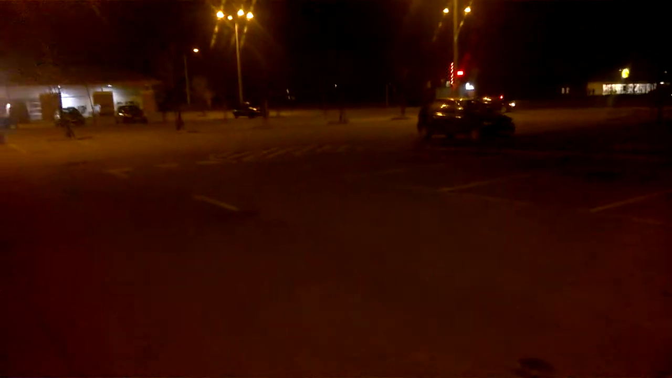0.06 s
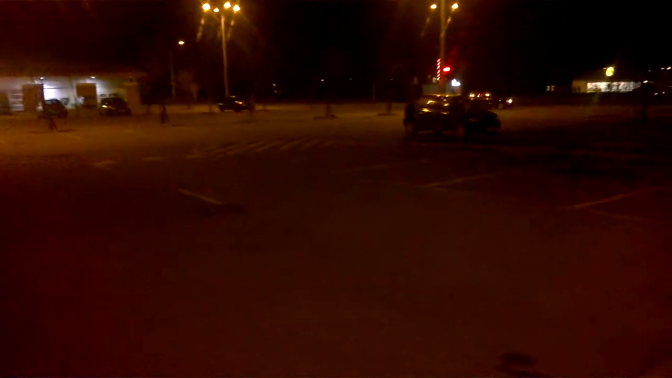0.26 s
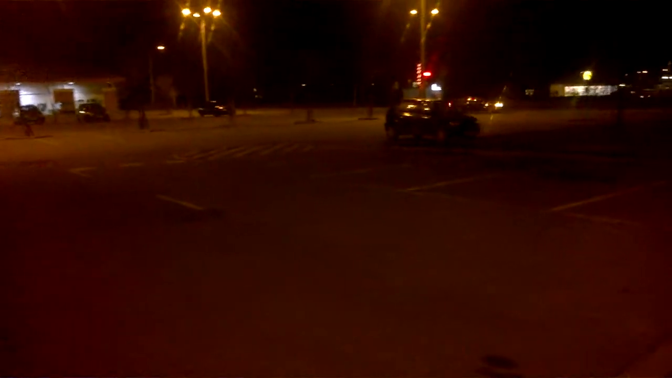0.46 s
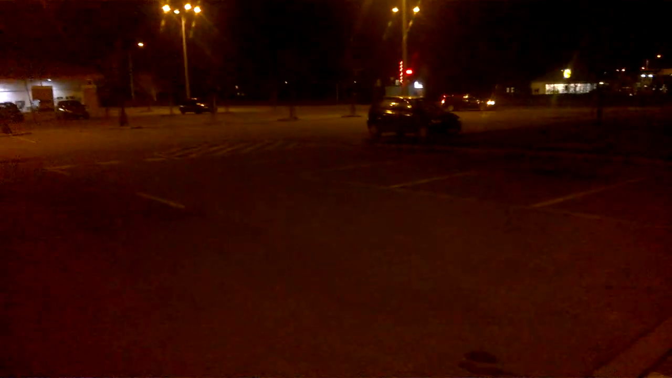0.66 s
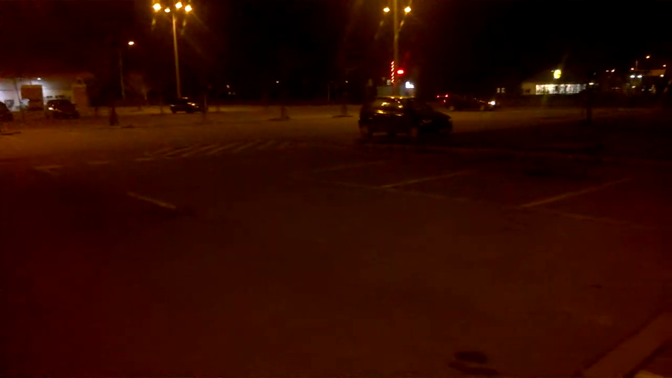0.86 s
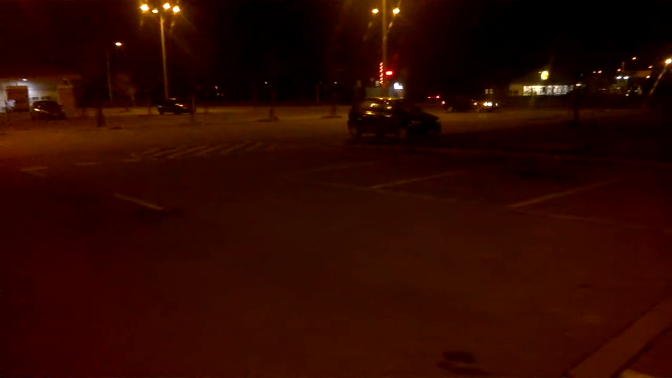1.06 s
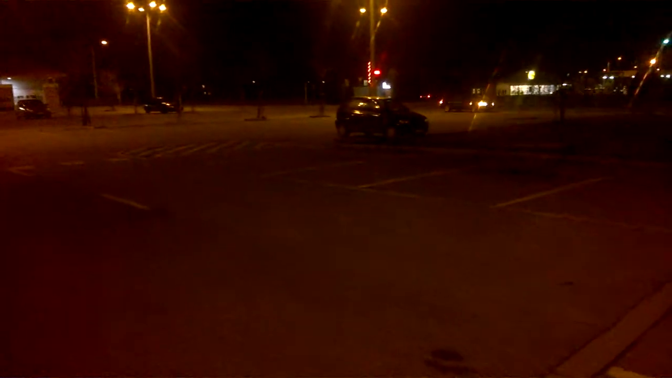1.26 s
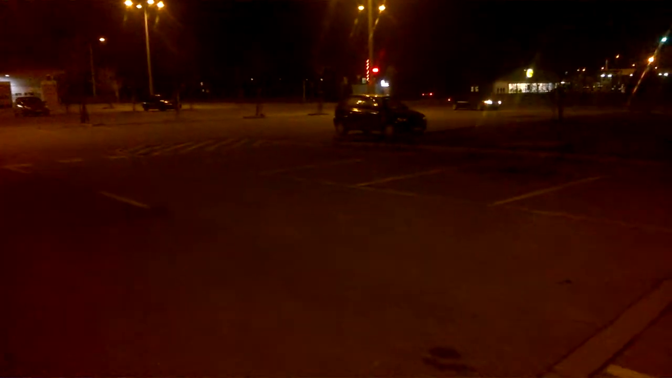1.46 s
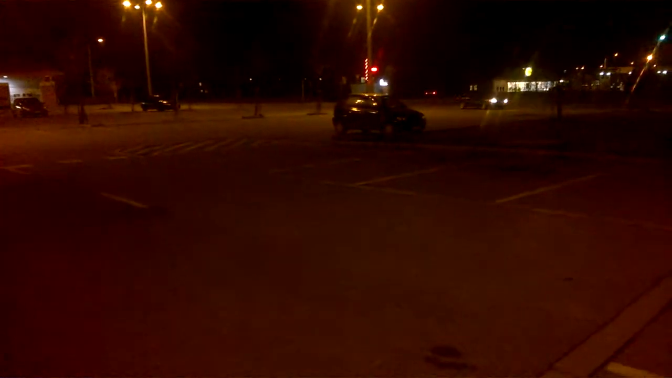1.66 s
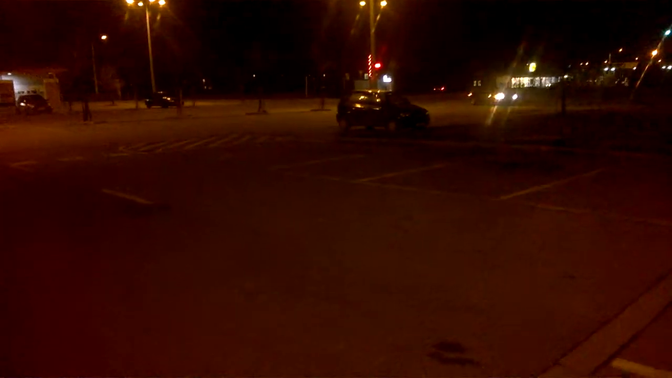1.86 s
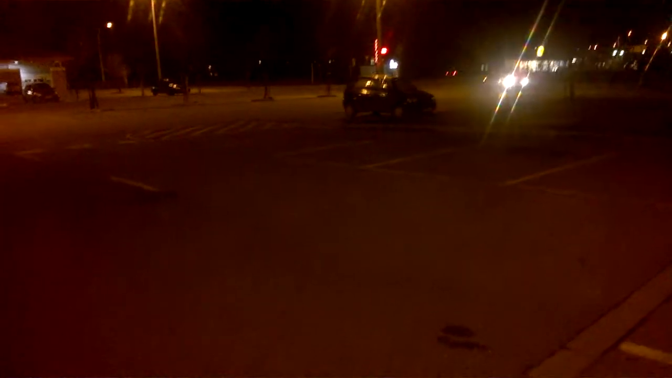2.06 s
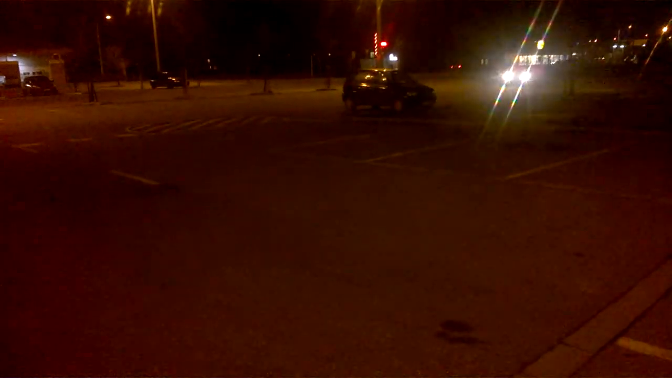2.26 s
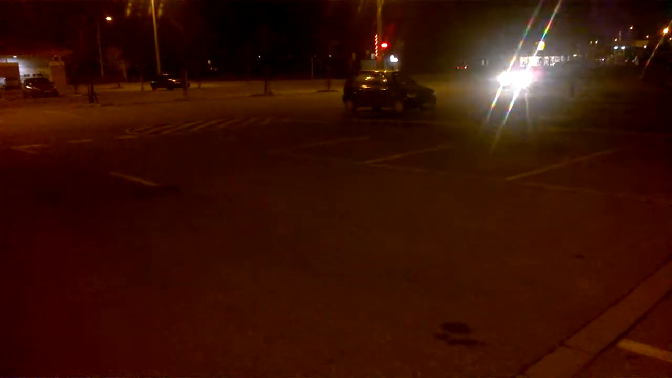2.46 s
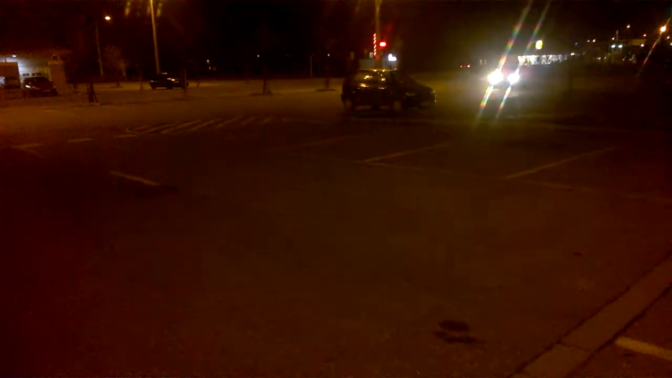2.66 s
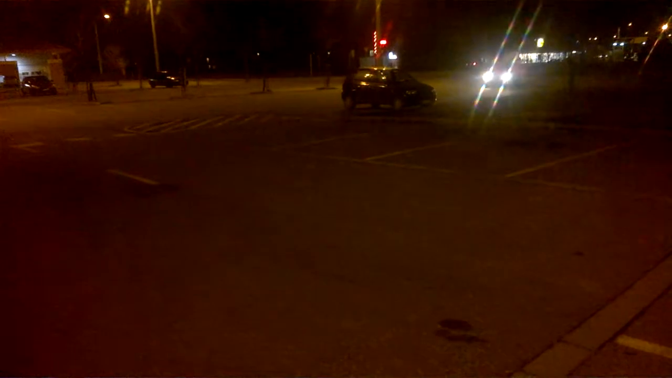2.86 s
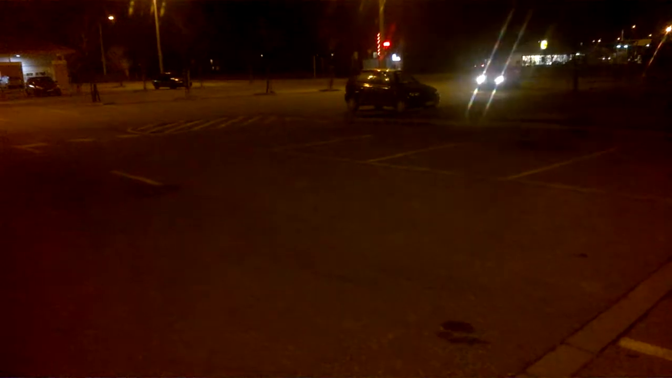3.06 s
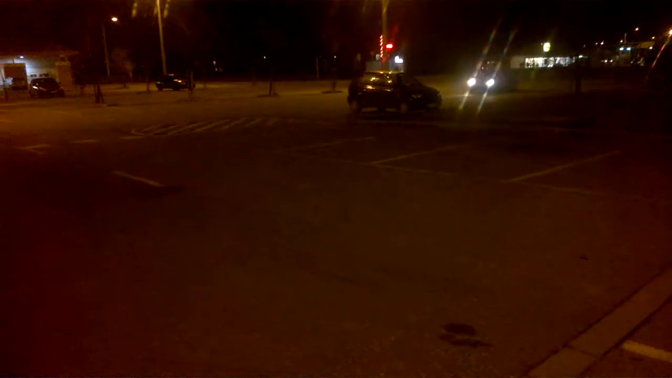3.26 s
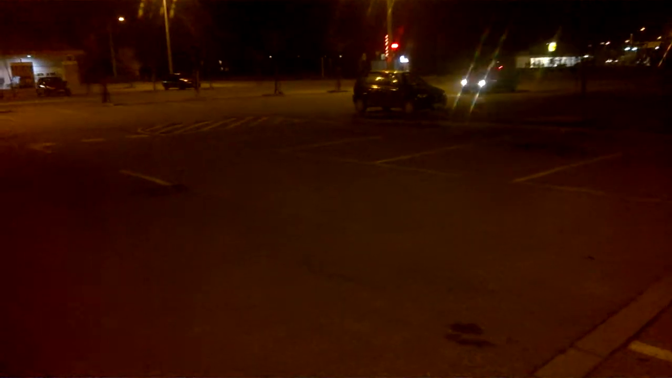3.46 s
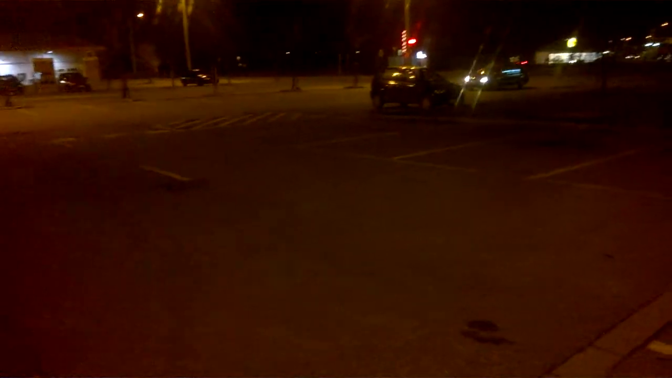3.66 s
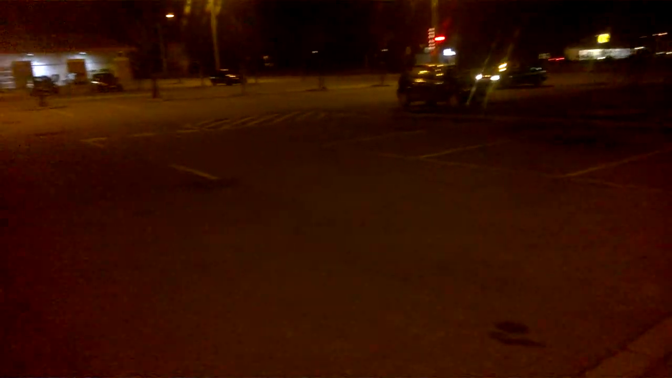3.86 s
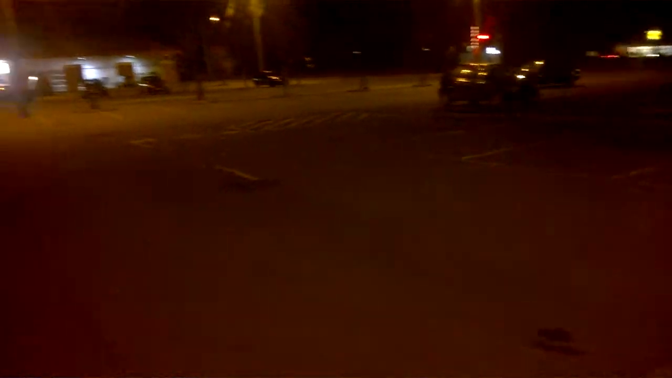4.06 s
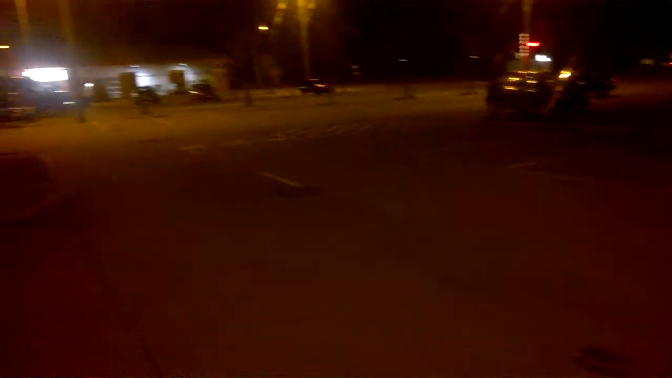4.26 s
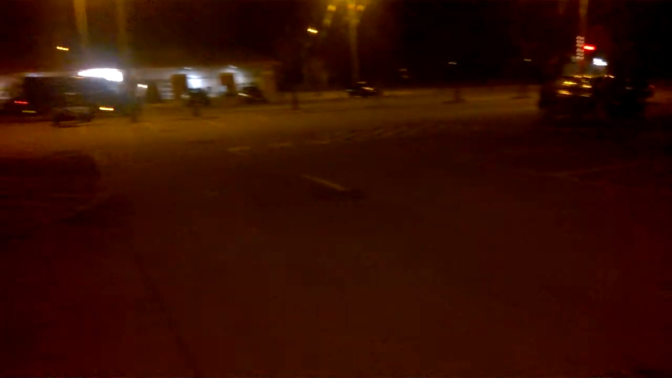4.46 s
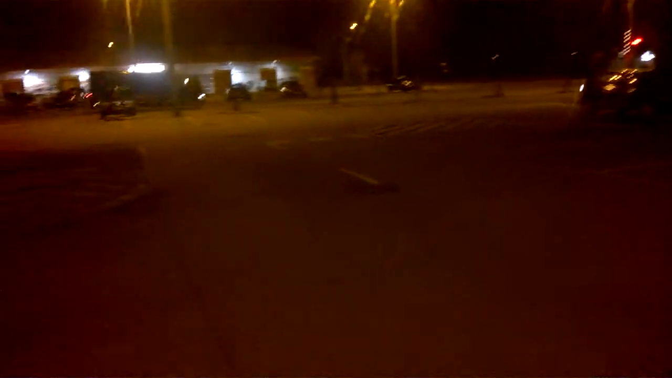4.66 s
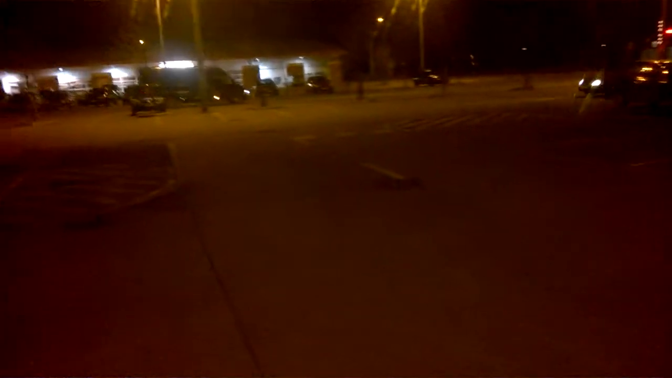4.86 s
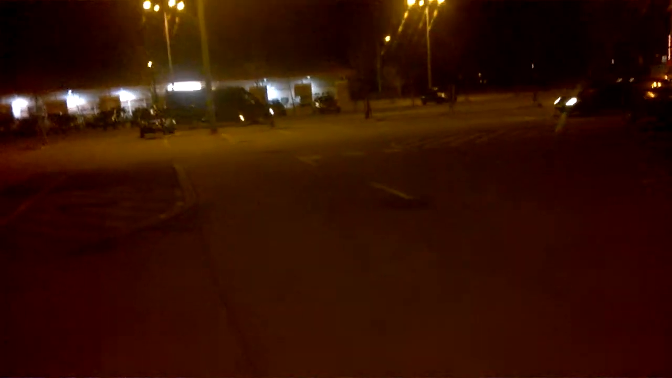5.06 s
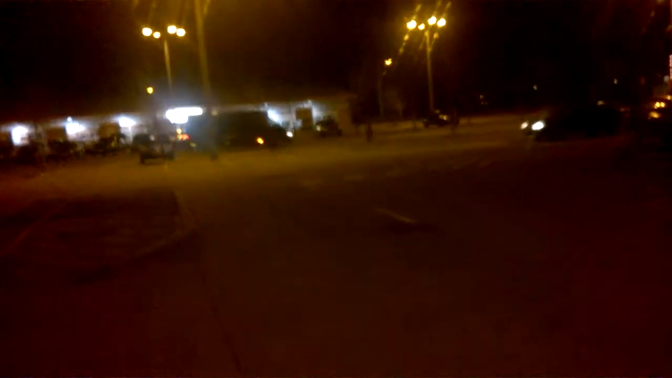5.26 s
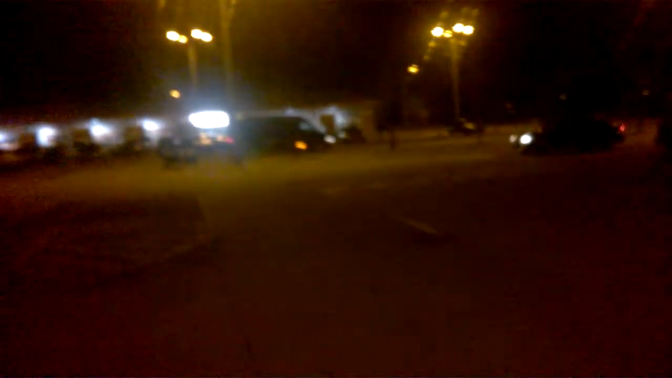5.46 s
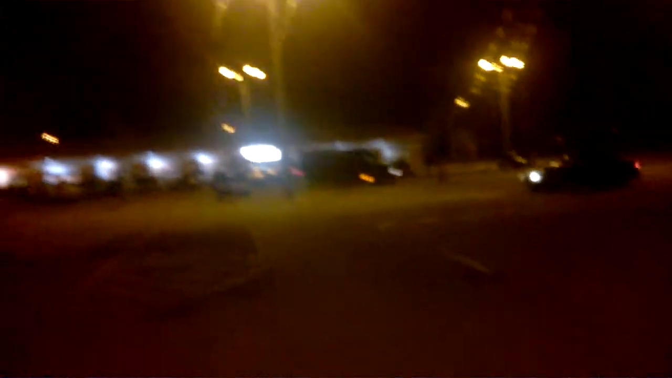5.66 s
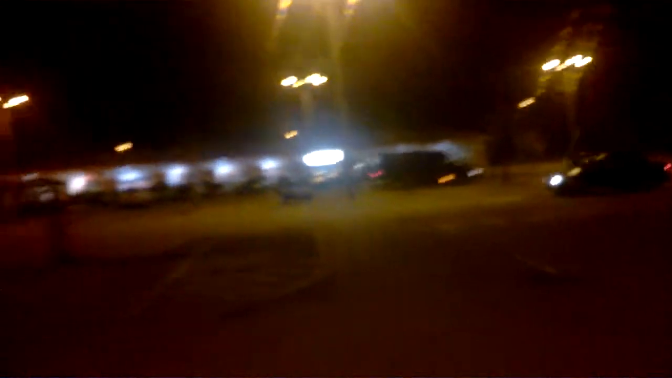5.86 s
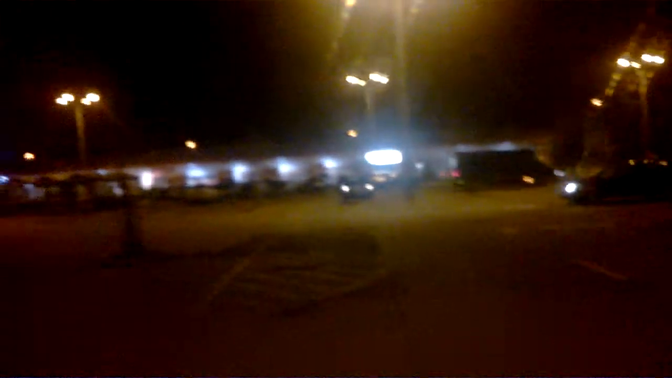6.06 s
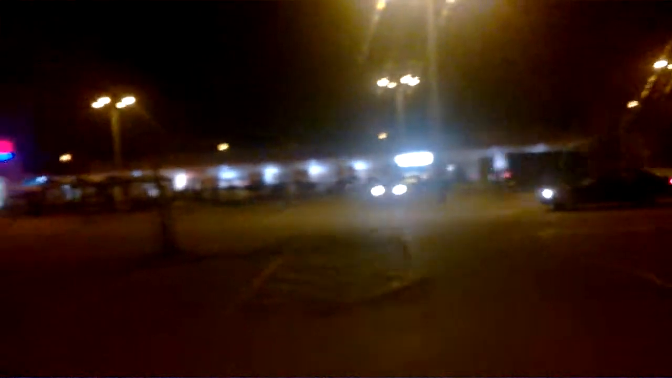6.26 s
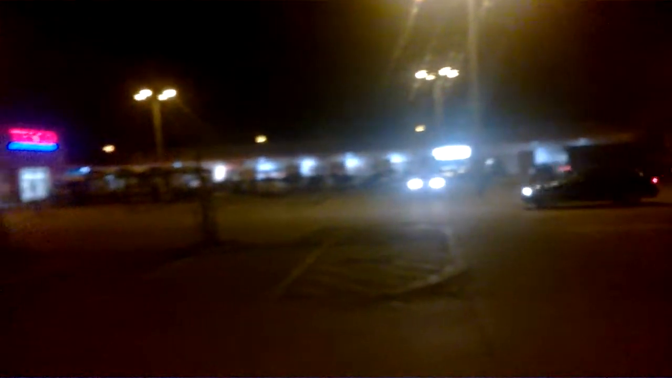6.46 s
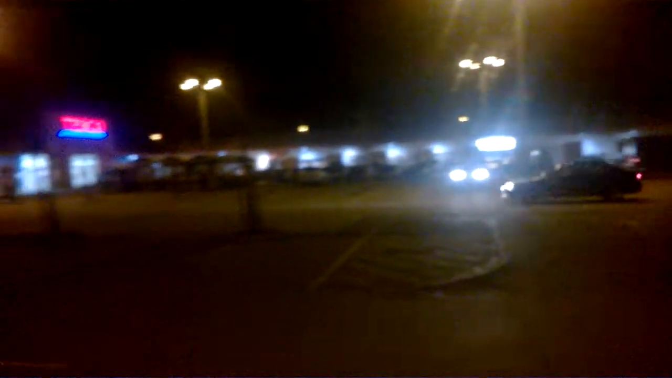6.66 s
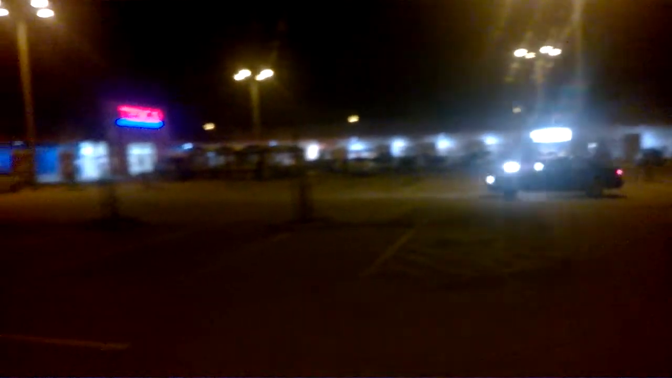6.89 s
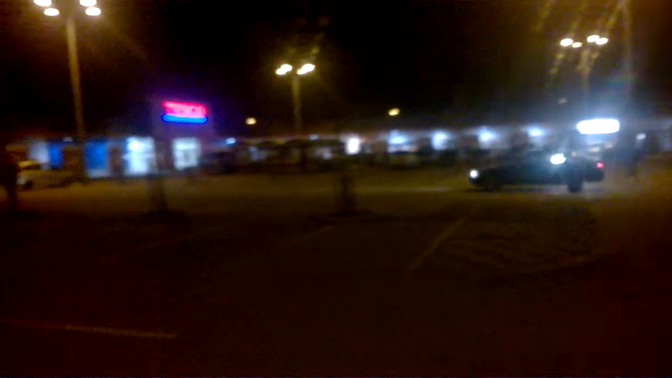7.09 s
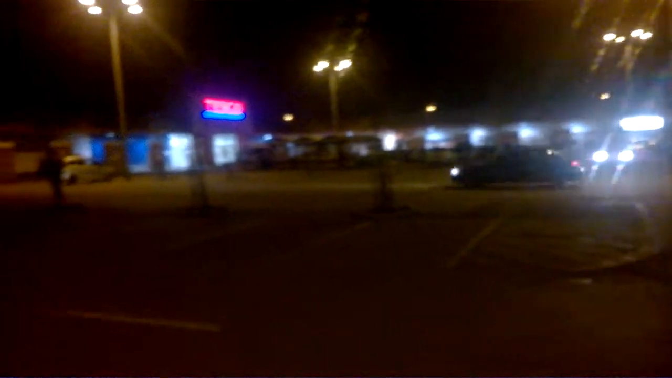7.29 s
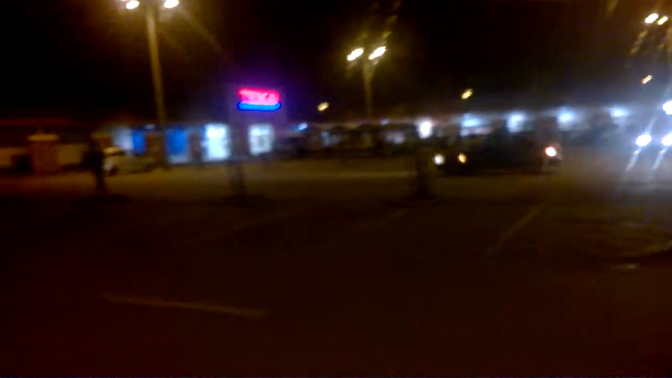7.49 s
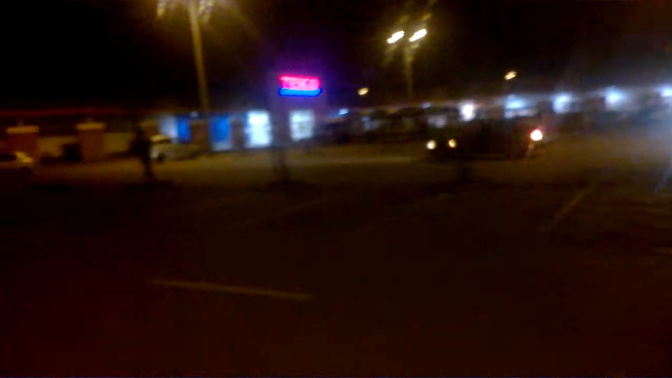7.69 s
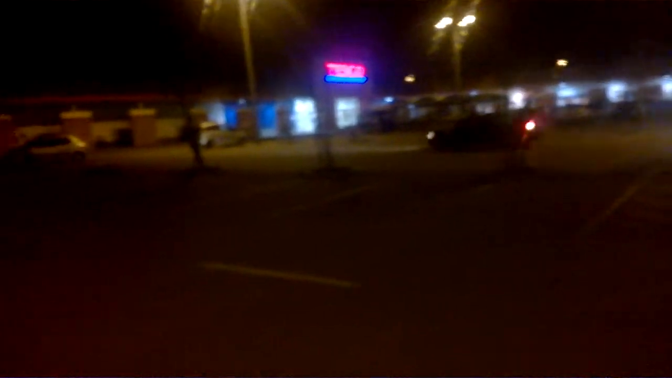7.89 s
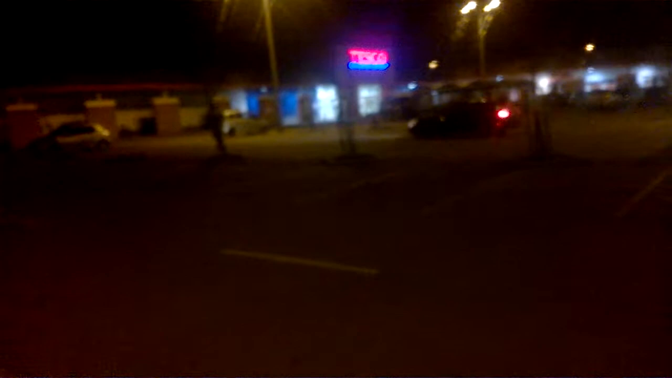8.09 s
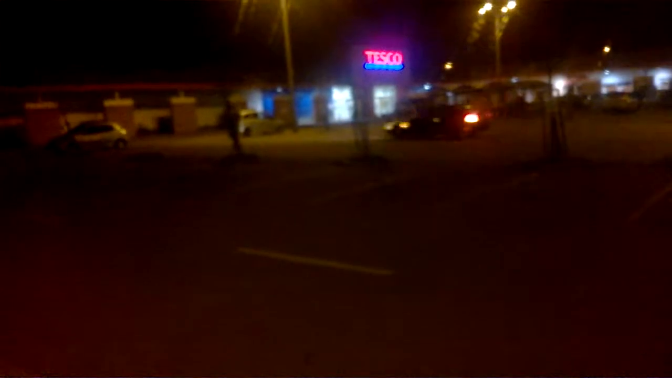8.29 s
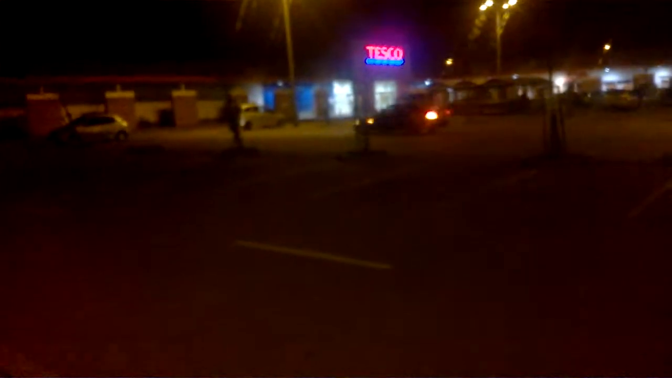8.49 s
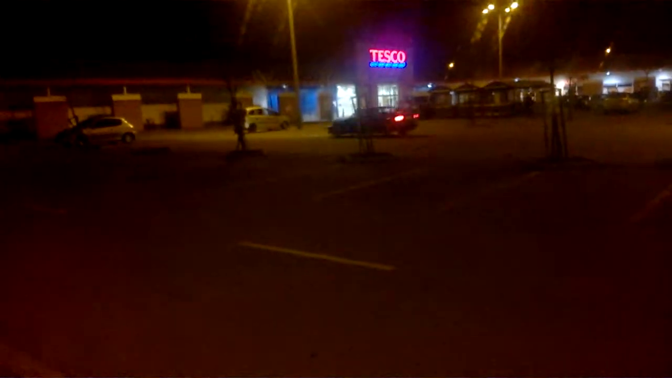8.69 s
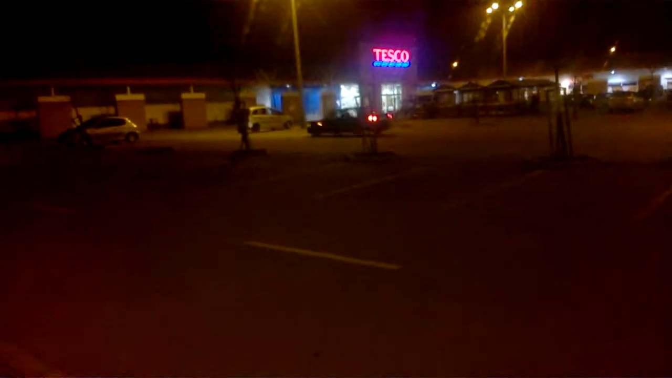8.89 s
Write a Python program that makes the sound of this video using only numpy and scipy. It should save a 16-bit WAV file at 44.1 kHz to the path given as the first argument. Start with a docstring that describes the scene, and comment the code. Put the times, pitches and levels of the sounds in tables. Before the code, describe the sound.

Low exhaust burble rises and drops, then swells into a strong droning roar before falling away, over steady airy tyre hiss in an open lot.

```python
"""A car with a loud exhaust crosses an open parking lot at night. It idles and pulls away while a second engine
drones far off, lifts off, revs higher as it comes near, then coasts down, its tyres scuffing. The engine is a
sum of firing orders shaped by the pipe, plus gas noise; shop fronts echo its note. Tyre roar on the asphalt is
coloured noise combed by a short echo; a few grit ticks are filtered clicks. The microphone adds faint hiss and
cuts the top."""
import sys
import numpy as np
from scipy import signal
from scipy.fft import rfft, irfft, next_fast_len
from scipy.io import wavfile
from scipy.ndimage import map_coordinates

SR = 44100
rng = np.random.default_rng(int(sys.argv[2]) if len(sys.argv) > 2 else 0)


def to_wav(sig):
    """Store sig (one row per channel, or 1-D mono) as 16-bit WAV at the path in sys.argv[1].

    Samples outside -1..1 are clipped; the rate is SR.
    """
    pcm = np.clip(np.atleast_2d(sig), -1, 1) * 32767
    pcm = np.round(pcm).astype(np.int16)
    wavfile.write(sys.argv[1], SR, pcm.T)  # frames by channels


N = 393813

# Far engine. Each row: time in seconds, pitch in Hz, level in dB.
FAR_ENGINE_CURVE = [(1.15, 74.6, -73), (1.7, 74, -50.5), (2.1, 76, -48), (2.25, 64.2, -56.5),
                    (3.0, 64.65, -46.5), (3.7, 66.57, -46.5), (4.4, 69.9, -44), (4.7, 69, -86)]

# Grit ticks. Each row: time in seconds, click level in dB ahead of the band-pass.
GRIT_TICKS = [(1.7469, -41), (3.8846, -58), (4.815, -72), (4.8456, -62), (5.3481, -52), (6.3587, -45),
              (6.4242, -58)]
TICK_FADE_S, TICK_BAND_HZ = 0.009, (2800, 5400)

# Tyre noise ahead of the ground echo. Each row: time in seconds, tread roar in dB, tread hiss in dB,
# grit hiss in dB, top of the hiss in dB.
TYRE_LEVELS = [(0.03, -67, -55, -60.5, -82), (0.1, -64, -54.5, -59, -83), (0.82, -66, -61.5, -63.5, -84),
               (1.66, -63, -56, -62.5, -83), (2.42, -59, -55, -68.5, -82.5), (2.45, -59, -55.5, -72.5, -83),
               (2.77, -60, -56.5, -69, -83), (2.87, -57, -57, -60.5, -84), (3.88, -61.5, -55, -63, -81),
               (4.18, -63.5, -53.5, -60.5, -84.5), (4.5, -64, -52, -58, -78), (5.22, -54, -50.5, -55, -77),
               (5.34, -54, -51, -57, -74), (5.66, -51, -53.5, -57.5, -77.5),
               (6.25, -49, -50.5, -56.5, -77.5), (6.58, -53, -50.5, -58.5, -80.5),
               (7.19, -51.5, -52, -61.5, -81), (7.64, -52, -47.5, -56, -74.5),
               (8.18, -54, -46.5, -57.5, -72.5), (8.9, -59.5, -48.5, -62, -75)]
# Tyre noise spectra. Each row: frequency in Hz, relative density in dB per Hz.
TREAD_ROAR_SPECTRUM = [(500, -27.5), (750, -6.5), (1050, 1), (1300, -1), (1700, -14.5), (2400, -16)]
TREAD_HISS_SPECTRUM = [(900, -26), (1300, -3), (1700, 2), (1950, 0.5), (2200, -0.5), (2700, -7),
                       (3400, -28)]
GRIT_HISS_SPECTRUM = [(2200, -9.5), (3000, 1.5), (3600, 1.5), (4200, 0), (4700, -10), (5500, -29.5)]
TOP_HISS_SPECTRUM = [(3800, -28.5), (5000, -7), (6000, -7), (7500, -15), (9000, -24.5), (12000, -43.5)]
# Bright scuff as the tyres turn: start, full, fading and gone, in seconds.
SCUFF_TIMES_S = (7.35, 7.65, 8.27, 8.45)
SCUFF_DB = -64
# Scuff spectrum. Each row: frequency in Hz, relative density in dB per Hz.
SCUFF_SPECTRUM = [(3800, -17.5), (4400, -2), (5000, -2.5), (5500, -7.5), (6000, -21), (6600, -33)]
# Echo of the road noise off the asphalt. Each row: time in seconds, lag in ms, share of the direct gain (0-1).
GROUND_ECHO = [(0, 0.49, 0.28), (1.5, 0.51, 0.14), (2.5, 0.61, .3), (3.8, 0.64, 0.37), (3.95, 0.94, 0.23),
               (4.65, 0.78, 0.29), (5.4, 0.69, 0.16), (5.7, 1.1, 0.13), (6.2, 1.028, 0.24), (7.0, 1, .2),
               (8.3, 0.84, .1), (8.93, 0.93, .15)]

# Exhaust gas noise. Each row: time in seconds, rumble in dB, rasp in dB.
GAS_LEVELS = [(0, -48, -56.5), (1.1, -39, -58), (1.6, -52, -52.5), (2.25, -39, -54.5), (2.7, -53.5, -58),
              (3.7, -51, -56), (4.8, -37.5, -53), (5.6, -44.5, -52), (6.2, -37.5, -50), (6.9, -42, -52.5),
              (7.5, -35.5, -51), (7.85, -51.5, -52), (8.15, -44.5, -55), (8.93, -53.5, -56)]
# Gas noise spectra. Each row: frequency in Hz, relative density in dB per Hz.
RUMBLE_SPECTRUM = [(15, -29), (28, -11.5), (45, -11.5), (70, 5), (100, -2.5), (145, -14), (175, -17),
                   (260, -34.5)]
RASP_SPECTRUM = [(150, -23), (200, -2), (260, -2), (340, -4), (420, -8.5), (600, -10), (700, -12),
                 (800, -15.5), (1000, -29.5)]
# Tailpipe hiss spectrum. Each row: frequency in Hz, relative density in dB per Hz.
TAILPIPE_SPECTRUM = [(850, -20.5), (980, -1.5), (1060, -0.5), (1150, -3.5), (1350, -27), (1650, -24.5),
                     (1800, -4), (1900, -4), (2050, -8.5), (2250, -26)]
# Gas rushing through the tailpipe at full throttle: start, full, fading and gone, in seconds.
TAILPIPE_RUSH_TIMES_S = (5.0, 5.6, 6.5, 6.9)
TAILPIPE_RUSH_DB = -52

# Shop fronts. Each row: delay in seconds, echo gain in dB.
SHOP_FRONT_ECHOES = [(0.128, -26), (0.288, -19), (.42, -17)]

# Engine. Each row: time in seconds, firing rate in Hz, note level in dB ahead of dips and pipe,
# brightness in dB per octave, gain of the note above the silencer's cut in dB.
ENGINE_CURVE = [(0, 42.95, -38.5, 3.5, -6), (.14, 41.47, -42.5, 2.5, -10), (.32, 43.22, -38, 4, -11.5),
                (1.2, 43.36, -39.5, 0.7, 0), (1.4, 45.7, -33, 4.5, 0), (1.75, 53.7, -32, 7.5, -16),
                (2.03, 58.45, -33, 2.5, -0.5), (2.31, 59.2, -36.5, -3.5, 1), (2.62, 49.8, -55, 1.5, 0),
                (3.2, 49.05, -51.5, 1.5, -7), (3.4, 50.86, -39, 2.5, -15), (3.52, 47.5, -42.5, 7.5, -17),
                (3.69, 52.2, -34, 2.5, -9.5), (4.0, 53.3, -30, -0.1, 2.5), (4.5, 59.46, -18, -10.5, 17.5),
                (5.02, 67.64, -13, -6, 4.5), (5.52, 73.75, -22.5, 4.5, -0.5), (6.0, 80, -26.5, 5.5, 3),
                (6.3, 84.5, -17.5, -1.5, 12.5), (6.54, 89.2, -23.5, -1, 20.5), (6.68, 83.8, -31.5, 2.5, -4),
                (6.9, 78.65, -23, -11.5, -1), (7.15, 72, -20, -15.5, 7), (7.42, 61.55, -21.5, -8, 2),
                (7.79, 44.4, -36.5, 5, -7), (7.92, 38.8, -28, -3.5, -14), (8.0, 39.43, -48, -2, 0),
                (8.15, 46.67, -38.5, -8, 8), (8.93, 48.02, -42.5, -2.5, -3)]
# How unevenly the cylinders fire. Each row: time in seconds, roughness (0-1).
ROUGHNESS = [(0, .25), (.7, .3), (1.2, .45), (1.5, .2), (2.0, .4), (2.4, 1), (3.4, .7), (3.7, .4),
             (4.4, .4), (4.75, .1), (5.7, .12), (6.5, .25), (6.9, .3), (7.8, .35), (8.1, 1)]
# Brief dips of the note. Each row: time in seconds, depth in dB.
NOTE_DIPS = [(.73, 9), (1.071, 11.5), (1.14, 11), (1.779, 9), (2.21, 12), (2.371, 17), (3.86, 6.5),
             (4.11, 4.5), (4.341, 16), (5.74, 3), (5.959, 1.5), (6.07, 4.5), (6.74, 8), (7.17, 4),
             (7.69, 13)]
DIP_HALF_WIDTH_S = 0.02
# Pipe and silencer response met by every order. Each row: frequency in Hz, gain in dB.
PIPE_RESPONSE = [(35.0, -21.5), (50.0, -9), (65.0, -27.5), (77.0, -5.5), (85.0, 0.0), (95.0, -4),
                 (110.0, -4.5), (130.0, -5.0), (150.0, -12), (162.0, -22.5), (178.0, -33.5), (195.0, -19),
                 (215.0, -23.5), (240.0, -22.5), (260.0, -38), (280.0, -41), (310.0, -34.1), (350.0, -38),
                 (385.0, -38.5), (420.0, -46.5), (480.0, -36), (520.0, -51), (560.0, -59.5), (640.0, -65)]
# Silencer's cut: start and end of the transition, in Hz.
SILENCER_TRANSITION_HZ = (150, 180)
ORDERS = range(1, 9)   # multiples of the firing rate
# At full roughness: spread of phase, spread of level, and extra level spread for each order.
WAVER_RAD, FLICKER_DB, FLICKER_PER_ORDER_DB = 0.56, 4, 0.67
# Order 1.5, from uneven firing after the lift-off: start, full, fading and gone, in seconds.
HALF_ORDER_TIMES_S = (6.62, 6.85, 6.98, 7.25)
HALF_ORDER_DB = -35.5

MIC_HISS_DB, MIC_CUTOFF_HZ = -87.5, 15750   # hiss level ahead of the low-pass


def amp(db):
    """Decibels to gain."""
    return 10 ** (np.asarray(db) / 20)


def rms_one(x):
    """Scale to rms 1."""
    return x / np.sqrt(np.mean(x ** 2) + 1e-20)


def in_time(rows):
    """Table columns as sample-by-sample curves."""
    knots_s, *columns = np.transpose(rows)
    time_s = np.arange(N) / SR
    return [np.interp(time_s, knots_s, column) for column in columns]


def swell(start_s, full_s, fading_s, gone_s, db):
    """Gain that rises from silence, holds and falls back."""
    ramp = np.interp(np.arange(N) / SR, [start_s, full_s, fading_s, gone_s], [0, 1, 1, 0])
    return amp(db) * ramp ** 2


def drift(corner_hz):
    """Slow random curve of spread 1: coarse noise through a double one-pole low-pass."""
    step = 40   # samples per coarse point
    settle = 2000   # coarse points dropped while the filter settles
    pole = np.exp(-2 * np.pi * corner_hz * step / SR)
    noise = rng.standard_normal(N // step + 2 + settle)
    slow = signal.lfilter([1], [1, -2 * pole, pole * pole], noise)[settle:]
    return np.interp(np.arange(N) / step, np.arange(len(slow)), rms_one(slow))


def coloured(spectrum, flicker_db):
    """Noise of rms 1 with the given spectrum and a quick unevenness."""
    hz, db = np.transpose(spectrum)
    size = next_fast_len(N)
    grid_hz = np.maximum(np.arange(size // 2 + 1) * SR / size, 1)
    shape = amp(np.interp(np.log(grid_hz), np.log(hz), db, left=-90, right=-90))
    noise = irfft(rfft(rng.standard_normal(size)) * shape, size)[:N]
    return rms_one(noise * amp(flicker_db * drift(9.9)))


def tone(turns, level_db, wobble_rad, flicker_db):
    """One engine order: a sine whose phase and strength waver at random."""
    phase_rad = 2 * np.pi * (turns + rng.random()) + wobble_rad * drift(13.0)
    gain = np.sqrt(2) * amp(level_db + flicker_db * drift(12))   # level is rms
    return gain * np.sin(phase_rad)


def far_engine():
    """A rough distant drone: one wavering sine that rises and fades out."""
    pitch_hz, level_db = in_time(FAR_ENGINE_CURVE)
    return tone(np.cumsum(pitch_hz) / SR, level_db, wobble_rad=0.5, flicker_db=2.5)


def ticks():
    """Grit ticks: a sharp click and a decaying noise tail, band-passed together."""
    clicks = np.zeros(N)
    for time_s, db in GRIT_TICKS:
        clicks[round(time_s * SR)] = amp(db)
    decay = np.exp(-1 / (TICK_FADE_S * SR))
    tail = signal.lfilter([1], [1, -decay], clicks) * rng.standard_normal(N)
    band = signal.butter(3, TICK_BAND_HZ, "band", fs=SR, output="sos")
    return signal.sosfilt(band, amp(-0.5) * clicks + amp(-5.5) * tail)


def ground_echo(x):
    """A copy about a millisecond late combs the noise; the comb shifts as the lag changes."""
    lag_ms, share = in_time(GROUND_ECHO)
    late = map_coordinates(x, [np.arange(N) - lag_ms * SR / 1000], order=3, mode="nearest")
    share = np.clip(share, 0, 1)
    return (x + share * late) / np.sqrt(1 + share ** 2)   # holds the level for unrelated copies


def road():
    """Tyre noise: tread roar, tread and grit hiss and a scuff, combed by the ground."""
    roar_db, hiss_db, grit_db, top_db = in_time(TYRE_LEVELS)
    tyres = amp(roar_db) * coloured(TREAD_ROAR_SPECTRUM, flicker_db=0.87)
    tyres += amp(hiss_db) * coloured(TREAD_HISS_SPECTRUM, flicker_db=1.02)
    tyres += amp(grit_db) * coloured(GRIT_HISS_SPECTRUM, flicker_db=1.38)
    tyres += amp(top_db) * coloured(TOP_HISS_SPECTRUM, flicker_db=1.3)
    tyres += swell(*SCUFF_TIMES_S, SCUFF_DB) * coloured(SCUFF_SPECTRUM, flicker_db=0.7)
    return ground_echo(tyres)


def shop_fronts(x):
    """A few late echoes, which trail the gliding pitch."""
    return sum(amp(db) * np.pad(x, (round(delay_s * SR), 0))[:N] for delay_s, db in SHOP_FRONT_ECHOES)


def gas():
    """Turbulent gas rumbles and rasps in the silencer and hisses in the tailpipe."""
    rumble_db, rasp_db = in_time(GAS_LEVELS)
    rumble = amp(rumble_db) * coloured(RUMBLE_SPECTRUM, flicker_db=-2.5)
    rasp = amp(rasp_db) * coloured(RASP_SPECTRUM, flicker_db=0.8)
    rush_gain = swell(*TAILPIPE_RUSH_TIMES_S, TAILPIPE_RUSH_DB)
    return rumble + rasp + rush_gain * coloured(TAILPIPE_SPECTRUM, flicker_db=1.0)


def exhaust():
    """Orders of the firing rate; each swells as it crosses the pipe's resonances."""
    firing_hz, level_db, bright_db, upper_db = in_time(ENGINE_CURVE)
    rough, = in_time(ROUGHNESS)
    time_s = np.arange(N) / SR
    for dip_s, depth_db in NOTE_DIPS:
        level_db = level_db - depth_db * np.exp(-((time_s - dip_s) / DIP_HALF_WIDTH_S) ** 2)

    # the firings come a little early or late
    turns = np.cumsum(firing_hz) / SR + 0.04 * rough * drift(5)
    half_order_gain = swell(*HALF_ORDER_TIMES_S, HALF_ORDER_DB)
    note = half_order_gain * tone(1.5 * turns, 0, rough, FLICKER_DB * rough)

    pipe_hz, response_db = np.transpose(PIPE_RESPONSE)
    for k in ORDERS:
        order_hz = k * firing_hz
        pipe_db = np.interp(order_hz, pipe_hz, response_db)
        silencer_db = upper_db * np.interp(order_hz, SILENCER_TRANSITION_HZ, [0, 1])
        order_db = level_db + bright_db * np.log2(k) + pipe_db + silencer_db
        flicker_db = (FLICKER_DB + k * FLICKER_PER_ORDER_DB) * rough
        note += tone(k * turns, order_db, WAVER_RAD * rough, flicker_db)
    return note


def scene():
    """Car, echoes of its note, far engine and grit, in one channel."""
    note = exhaust()
    return (note + shop_fronts(note) + gas() + far_engine() + road() + ticks())[None]


def record(dry):
    """The microphone adds a faint hiss; a steep low-pass cuts the top."""
    hiss = amp(MIC_HISS_DB) * rng.standard_normal(dry.shape)
    low_pass = signal.ellip(10, 0.5, 60, MIC_CUTOFF_HZ, fs=SR, output="sos")
    return signal.sosfilt(low_pass, dry + hiss)


dry = scene()
out = record(dry)
to_wav(out)
```